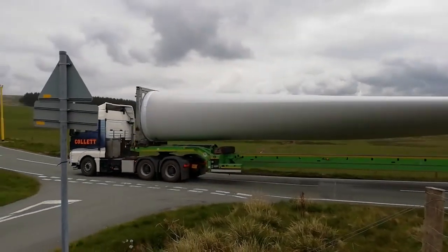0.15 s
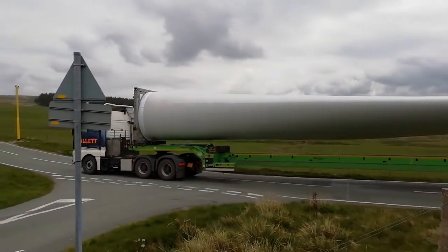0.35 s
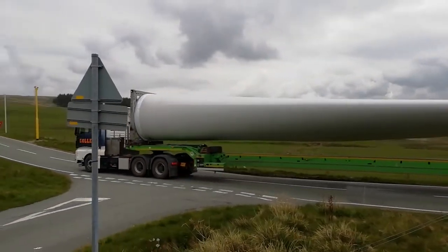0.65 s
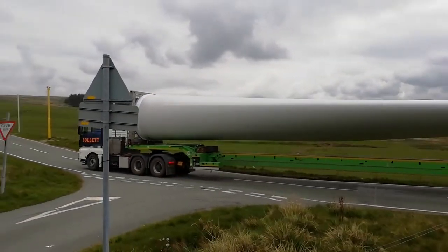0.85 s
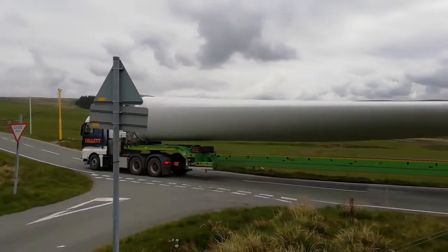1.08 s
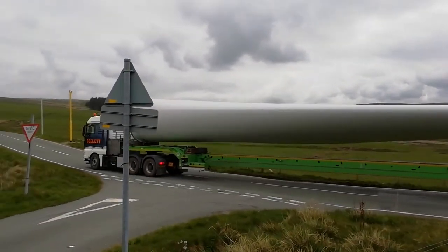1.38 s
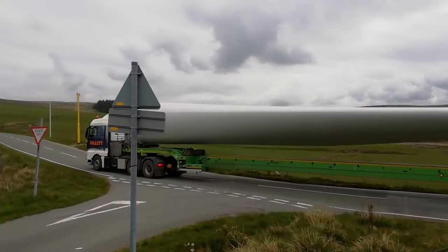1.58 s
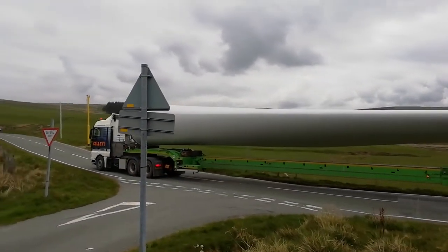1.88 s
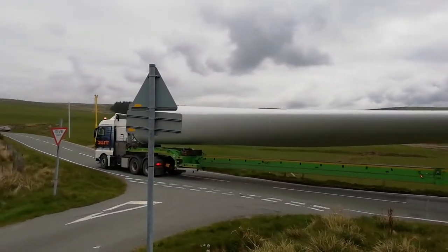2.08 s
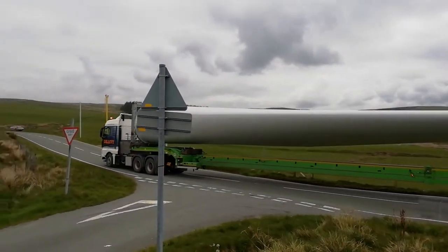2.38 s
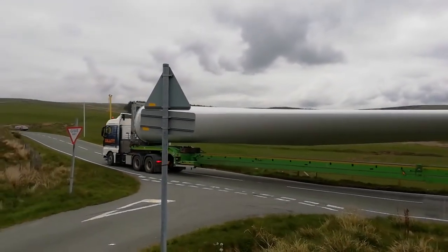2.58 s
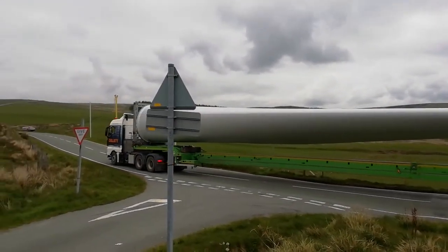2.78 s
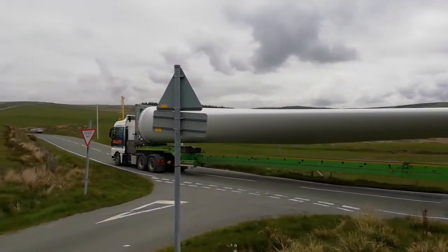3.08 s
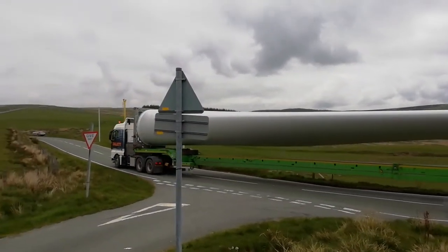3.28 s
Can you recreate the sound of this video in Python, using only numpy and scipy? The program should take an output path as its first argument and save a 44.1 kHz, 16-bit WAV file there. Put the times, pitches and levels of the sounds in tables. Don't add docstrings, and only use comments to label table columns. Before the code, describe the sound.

A heavy truck pulls away outdoors: low steady exhaust drone, body rumble and mid-range tyre roar, softening after 1.2 s, over a faint diesel idle. Air hisses with a faint, extremely high whistle until 2.8 s. A piercing brake squeal runs 0.5-1.9 s, returning weakly near 2.2; stuttering groan at 0.9-1.3. Small squeaks and tyre scrubs follow, soft wind puffs throughout, and an abrupt air release at 3.4 s.

```python
import sys
import numpy as np
from scipy import signal
from scipy.fft import rfft, irfft, next_fast_len
from scipy.io import wavfile
from scipy.ndimage import uniform_filter1d, map_coordinates

SR = 44100
rng = np.random.default_rng(int(sys.argv[2]) if len(sys.argv) > 2 else 0)


def magnitude_from_level(level_db):
    exponent = np.asarray(level_db, float) / 20
    return 10 ** exponent


def master(y):
    cut = np.clip(np.atleast_2d(y).T, -1, 1)
    pcm = np.round(cut * 32767)
    wavfile.write(sys.argv[1], SR, pcm.astype(np.int16))


N = 152145

# time in seconds, firing rate in Hz, level in dB.
TRUCK_FIRING = [(0, 63, -45), (.15, 63, -50), (.33, 63, -38), (.5, 63, -40), (.65, 63, -45), (.7, 63, -40),
                (.8, 59.6, -35), (.92, 59.45, -37), (1, 59.35, -41), (1.1, 59.2, -40), (1.8, 59, -46),
                (1.9, 61.8, -58), (2.1, 61.5, -47), (2.3, 60.5, -46), (2.55, 60.5, -53), (2.7, 58.5, -46),
                (3.1, 61, -53), (3.45, 59, -50)]
# multiple of the firing rate, level in dB.
TRUCK_ORDERS = [(1, 0.5), (2, -16)]
TRUCK_START_TURNS = -0.26
# multiple of the idle rate, level in dB.
IDLE_ORDERS = [(1, -50), (2, -43), (3, -59.5), (4.6, -59.5)]
IDLE_HZ = 28.0
# frequency in Hz, level in dB.
CLATTER_SPECTRUM = [(3000, -70), (4700, -6), (5500, 0), (6200, -4), (8000, -70)]
CLATTER_DB, CLATTER_SHARPNESS = -60.5, 2.2

# time in seconds, level in dB.
ROLLING_LEVEL = [(0.0, -41), (0.05, -40.5), (0.57, -41), (0.59, -40), (1.23, -42.5), (2.07, -48.5),
                 (2.93, -50.5), (2.99, -53), (3.36, -48.5)]
# frequency in Hz, density in dB per Hz.
TREAD_SPECTRUM = [(190, -51), (330, -7.5), (473, -12), (697, 1.5), (1600, 3.5), (1840, 0.5), (2110, 0.5),
                  (2380, -9), (3000, -20), (3900, -22), (6600, -120)]
# frequency in Hz, density in dB per Hz.
BODY_SPECTRUM = [(15, -12), (38, -5), (62, -10), (85, -3), (125, -4), (155, -11), (300, -15), (550, -25),
                 (2000, -45), (6000, -90)]
BODY_DB, BODY_FOLLOWS = -47, 0.47

# time in seconds, level in dB.
LEAK_FLOW = [(0.0, -45), (0.52, -45), (0.64, -43.5), (0.98, -47.5), (1.23, -44.5), (1.69, -51),
             (2.14, -52.5), (2.28, -47.5), (2.33, -52.5), (2.87, -47.5), (3.04, -52.5), (3.35, -52),
             (3.36, -51.5)]
# frequency in Hz, density in dB per Hz.
LEAK_SPECTRUM = [(1500, -12.5), (2100, -1), (2600, -4.5), (4400, -6.5), (6500, -11.5), (8800, -2),
                 (9500, -6.5), (9900, -17.5), (11500, -13), (16000, -31.5)]
LEAK_DB = 3
# time in seconds, pitch in Hz, level in dB.
WHISTLE = [(.04, 15300, -66), (.07, 15300, -54), (.13, 15050, -50), (.24, 15230, -48), (.33, 15350, -56),
           (.4, 15150, -60), (.47, 14970, -49), (.6, 15330, -50), (.8, 15200, -55), (.99, 14900, -48),
           (1.07, 15430, -56), (1.3, 15420, -60), (1.36, 15000, -54), (1.55, 15450, -56), (1.7, 14700, -60),
           (1.82, 14560, -58), (2.04, 14560, -54), (2.14, 15000, -68), (2.4, 14800, -64),
           (2.53, 14850, -60), (2.63, 14190, -54), (2.74, 13950, -56), (2.8, 13120, -61),
           (2.83, 13050, -74)]
# start in seconds, length in seconds, pitch in Hz, level in dB.
SIDE_WHISTLES = [
    (-.1, 0.2, 14300, -48),
    (.03, 0.14, 14600, -52),
    (.23, 0.21, 14650, -49),
    (.4, .12, 14500, -56),
    (1.72, .07, 15650, -62),
    (1.86, 0.09, 15650, -55),
    (2.05, .07, 15650, -69),
    (2.17, .1, 15600, -55),
    (2.324, .12, 15700, -64),
]
WHISTLE_DB, WHISTLE_WIDTH_HZ = 3, 110

# centre in seconds, length in seconds, level in dB.
PUFFS = [
    (0.027, 0.075, -49),
    (0.496, 0.096, -54),
    (0.86, 0.18, -45),
    (1.388, .05, -56),
    (1.652, 0.1, -51.5),
    (2.118, 0.18, -46),
    (2.862, 0.096, -55),
    (3.428, 0.069, -55),
]
# frequency in Hz, density in dB per Hz.
PUFF_SPECTRUM = [(15, -24), (60, -3), (120, 0), (200, -14), (500, -80)]

# time in seconds, pitch in Hz, level in dB.
SQUEAL = [
    [(.52, 10250, -75), (.54, 10230, -45), (.6, 10350, -39), (.646, 10490, -32), (.672, 10500, -41),
     (.69, 10500, -35), (.76, 10500, -31)],
    [(.8, 10500, -39), (.815, 10480, -34), (.9, 10400, -43), (.93, 10320, -40), (1.005, 10290, -50),
     (1.025, 10270, -37), (1.12, 10290, -33)],
    [(1.14, 10380, -40), (1.165, 10470, -38), (1.21, 10370, -47), (1.26, 10330, -54), (1.3, 10280, -46),
     (1.33, 10290, -54), (1.345, 10310, -49), (1.385, 10300, -66)],
    [(1.42, 10250, -49), (1.466, 10240, -41), (1.486, 10220, -51), (1.504, 10250, -41), (1.55, 10460, -39),
     (1.65, 10500, -43), (1.69, 10450, -62)],
    [(1.71, 10380, -58), (1.735, 10290, -45), (1.79, 10400, -62), (1.81, 10330, -62), (1.842, 10270, -46),
     (1.9, 10290, -62), (1.93, 10300, -95)],
    [(2.1, 10250, -95), (2.15, 10260, -62), (2.2, 10300, -45), (2.27, 10440, -52), (2.3, 10400, -58),
     (2.326, 10300, -50), (2.44, 10260, -64), (2.46, 10260, -77)],
]
SQUEAL_DB, SQUEAL_LEFT_DB, SQUEAL_SCATTER = -1.5, -2, .95
SQUEAL_WIDTH_HZ, SKIRT_WIDTH_HZ, SKIRT_DB = 35, 220, -13
# start in seconds, length in seconds, level in dB.
GROAN = [
    (0.929, 0.047, -41),
    (.97, .055, -49),
    (1.011, 0.038, -43),
    (1.041, 0.047, -43),
    (1.067, 0.063, -37.5),
    (1.123, 0.038, -44.5),
    (1.143, 0.044, -40),
    (1.195, 0.023, -42),
    (1.222, 0.058, -38.5),
    (1.267, 0.034, -40.5),
]
# time in seconds, pitch in Hz.
GROAN_PITCH = [(.93, 1900), (.96, 1903), (1.03, 1947), (1.09, 1925), (1.16, 1902), (1.21, 1908),
               (1.25, 1922), (1.3, 1948)]
# start in seconds, length in seconds, level in dB.
GROAN_OCTAVE = [
    (1.105, .03, -54),
    (1.14, .05, -53),
    (1.195, .05, -46),
    (1.24, .045, -55),
]
# start in seconds, length in seconds, pitch in Hz, glide in Hz per second, level in dB.
SQUEAKS = [
    (1.485, .055, 9020, 0, -42),
    (2.68, .11, 1010, -150, -56),
    (2.77, .1, 990, -250, -57),
    (2.845, .06, 2000, 0, -51),
    (2.89, .07, 2000, 100, -57),
    (2.89, .04, 1760, -600, -55),
    (2.915, .04, 1620, -400, -56),
    (1.3, .42, 258, -30, -57),
    (1.95, .2, 215, 0, -59),
]

# start in seconds, length in seconds, level in dB.
SCUFFS = [
    (2.235, 0.075, -46),
    (2.551, 0.3, -51),
    (2.714, 0.14, -52),
    (2.82, .16, -50),
    (3.147, 0.071, -49),
    (3.35, .06, -50),
]
# frequency in Hz, density in dB per Hz.
SCUFF_SPECTRUM = [(800, -58), (1550, 3.5), (2050, 5), (2400, -6), (4000, -60)]

# frequency in Hz, density in dB per Hz.
BLOW_SPECTRUM = [(250, -16), (900, -6), (1350, 1), (1800, -4), (2500, -7), (4000, -9), (5200, -20),
                 (14000, -50)]
BLOW_START_S, BLOW_DB, BLOW_RISE_S, BLOW_T60_S = 3.395, -27, 0.007, 0.3

# frequency in Hz, left-right correlation.
PORT_LIKENESS = [(60, 0.96), (250, 0.99), (700, 0.51), (2000, 0.45), (5000, 0.077), (10000, 0.084)]
# frequency in Hz, left over right in dB.
PORT_SHADE = [(300, -.5), (640, 5.5), (1400, -6), (2800, 7.5), (5000, -1), (15000, -2)]
HALF_LEFT_RIGHT = np.array([[.5], [-.5]])
GROUND_LEAD_S, AIR_LEAD_S, MONO_HZ = .00016, 0.0004964, 244
GLINT_RATE_HZ, GLINT_SHARE = 70, 1.0
TOP_HZ = 15880
MASK_DB, MASK_DB_PER_KHZ, MASK_FROM_HZ = -14.5, 3.8, 11300


def unit(x):
    return x / np.sqrt(np.mean(x ** 2) + 1e-20)


def along(points, hz):
    f, v = np.transpose(points)
    return np.interp(np.log(hz + 1), np.log(f + 1), v)


def seconds():
    return np.arange(N) / SR


def curves(rows):
    s, *columns = np.transpose(rows)
    return [np.interp(seconds(), s, column) for column in columns]


def wobble(rate_hz):
    return map_coordinates(rng.standard_normal(N // 40), [seconds() * rate_hz])


def window(start_s, length_s):
    return np.sin(np.pi * np.clip((seconds() - start_s) / length_s, 0, 1))


def swells(events):
    return sum(magnitude_from_level(db) * window(start_s, length_s) for start_s, length_s, db in events)


def filtered(x, response):
    m = next_fast_len(N + 8192)
    return irfft(rfft(x, m) * response(np.fft.rfftfreq(m, 1 / SR)), m)[..., :N]


def rush(spectrum, patchy_db, apart=False):
    z = signal.stft(rng.standard_normal((2, N)), nperseg=512)[2]
    field = uniform_filter1d(rng.standard_normal(z.shape[1:]), size=6, axis=0)
    field = uniform_filter1d(field, size=10, axis=1)
    pair = signal.istft(z * magnitude_from_level(patchy_db * unit(field)), nperseg=512)[1][:, :N]

    def mid_side(hz):
        likeness = along(PORT_LIKENESS, hz) * (not apart)
        angle = np.arccos(np.clip(likeness, 0, 1)) / 2
        return magnitude_from_level(along(spectrum, hz)) * [np.cos(angle), np.sin(angle)]

    mid, side = filtered(pair, mid_side)
    return unit(np.array([mid + side, mid - side]))


def tone(hz, width_hz, share):
    phase = 2 * np.pi * np.cumsum(hz + width_hz * wobble(430)) / SR
    fade = np.array([1 + share * (wobble(GLINT_RATE_HZ) + 1j * wobble(GLINT_RATE_HZ)) for _ in "LR"])
    return unit(np.real(fade * np.exp(1j * phase)))


def truck_exhaust():
    hz, level_db = curves(TRUCK_FIRING)
    turns = TRUCK_START_TURNS + np.cumsum(hz) / SR
    return np.sqrt(2) * sum(magnitude_from_level(level_db + db + 1.2 * wobble(6.34)) * np.sin(2 * np.pi * order * turns)
                            for order, db in TRUCK_ORDERS)


def idling_diesel():
    turns = IDLE_HZ * seconds()
    exhaust = sum(magnitude_from_level(db + 0.89 * wobble(5.4)) * np.sin(2 * np.pi * order * turns)
                  for order, db in IDLE_ORDERS)
    gate = unit(np.exp(CLATTER_SHARPNESS * np.cos(2 * np.pi * turns)))
    return np.sqrt(2) * exhaust + magnitude_from_level(CLATTER_DB) * gate * rush(CLATTER_SPECTRUM, patchy_db=-1.0)


def rolling():
    level_db, = curves(ROLLING_LEVEL)
    tread_db = level_db + 0.94 + 0.38 * wobble(13)
    body_db = BODY_DB + BODY_FOLLOWS * (level_db - level_db.mean()) + 0.92 * wobble(7.5)
    tread = magnitude_from_level(tread_db) * rush(TREAD_SPECTRUM, patchy_db=1.24)
    return tread + magnitude_from_level(body_db) * rush(BODY_SPECTRUM, patchy_db=0.7)


def leak_hiss():
    flow_db, = curves(LEAK_FLOW)
    return magnitude_from_level(flow_db + LEAK_DB + 0.33 * wobble(14)) * rush(LEAK_SPECTRUM, patchy_db=1.57)


def leak_whistle():
    t = seconds()
    hz, level_db = curves(WHISTLE)
    sounding = (t > WHISTLE[0][0]) & (t < WHISTLE[-1][0])
    main = magnitude_from_level(level_db + WHISTLE_DB) * sounding * tone(hz, WHISTLE_WIDTH_HZ, GLINT_SHARE)
    sides = sum(magnitude_from_level(db) * np.sqrt(window(start_s, length_s)) * tone(pitch_hz, WHISTLE_WIDTH_HZ, GLINT_SHARE)
                for start_s, length_s, pitch_hz, db in SIDE_WHISTLES)
    return main + sides


def wind():
    gust = swells([(centre_s - length_s / 2, length_s, db) for centre_s, length_s, db in PUFFS])
    lumps = unit(magnitude_from_level(4 * wobble(25)))
    return gust * lumps * rush(PUFF_SPECTRUM, patchy_db=4.0, apart=True)


def brake_squeal():
    t = seconds()
    hz, level_db = curves([row for stretch in SQUEAL for row in stretch])
    sounding = (t > SQUEAL[0][0][0]) & (t < SQUEAL[-1][-1][0])
    gain = magnitude_from_level(level_db + SQUEAL_DB + SQUEAL_LEFT_DB * HALF_LEFT_RIGHT) * sounding
    core = tone(hz, SQUEAL_WIDTH_HZ, SQUEAL_SCATTER)
    skirt = magnitude_from_level(SKIRT_DB) * tone(hz, SKIRT_WIDTH_HZ, GLINT_SHARE)
    return gain * (core + skirt)


def brake_groan():
    hz, = curves(GROAN_PITCH)
    return swells(GROAN) * tone(hz, 4, .1) + swells(GROAN_OCTAVE) * tone(2 * hz, 8, .1)


def brake_squeaks():
    out = 0
    for start_s, length_s, hz, glide, db in SQUEAKS:
        pitch_hz = hz + glide * (seconds() - start_s)
        out = out + magnitude_from_level(db) * window(start_s, length_s) * tone(pitch_hz, hz * .002, .12)
    return out


def tyre_scuffs():
    return swells(SCUFFS) * rush(SCUFF_SPECTRUM, patchy_db=3.5)


def valve_blow_off():
    since_s = np.maximum(seconds() - BLOW_START_S, 0)
    decay = magnitude_from_level(BLOW_DB - 60 * since_s / BLOW_T60_S + 1.5 * wobble(120))
    rise = (1 - np.exp(-since_s / BLOW_RISE_S)) ** 2
    return decay * rise * rush(BLOW_SPECTRUM, patchy_db=0)


def ports(x, lead_s):
    def response(hz):
        shade = magnitude_from_level(HALF_LEFT_RIGHT * along(PORT_SHADE, hz))
        lead_turns = HALF_LEFT_RIGHT * lead_s * hz ** 3 / (hz ** 2 + MONO_HZ ** 2)
        return shade * np.exp(2j * np.pi * lead_turns)

    return filtered(x, response)


def masked(x):
    hz, _, z = signal.stft(x, SR, nperseg=2048)
    power = (np.abs(z[:, :1024]) ** 2).sum(axis=0)
    power = power.reshape(64, 16, -1).sum(axis=1)
    mid_hz = hz[8:1024:16]
    apart_khz = np.abs(mid_hz[:, None] - mid_hz) / 1000
    spread = magnitude_from_level(2 * (MASK_DB - MASK_DB_PER_KHZ * apart_khz)) * (mid_hz > 9900)
    threshold = (spread[..., None] * power).max(axis=1)
    keep = (power > threshold) | (mid_hz < MASK_FROM_HZ)[:, None]
    z[:, :1024] *= np.repeat(keep, 16, axis=0)
    return signal.istft(z, SR, nperseg=2048)[1][:, :N]


def scene():
    ground = truck_exhaust() + idling_diesel() + rolling() + tyre_scuffs()
    air = leak_hiss() + leak_whistle() + valve_blow_off()
    brakes = brake_squeal() + brake_groan() + brake_squeaks()
    return ports(ground, GROUND_LEAD_S) + ports(air, AIR_LEAD_S) + ports(brakes, 0) + wind()


def low_pass(x):
    return signal.sosfilt(signal.butter(12, 15880, fs=SR, output="sos"), x)


def record(dry):
    limited = filtered(dry, lambda hz: hz < TOP_HZ)
    mix = masked(limited)
    return low_pass(mix)


dry = scene()
out = record(dry)
master(out)
```